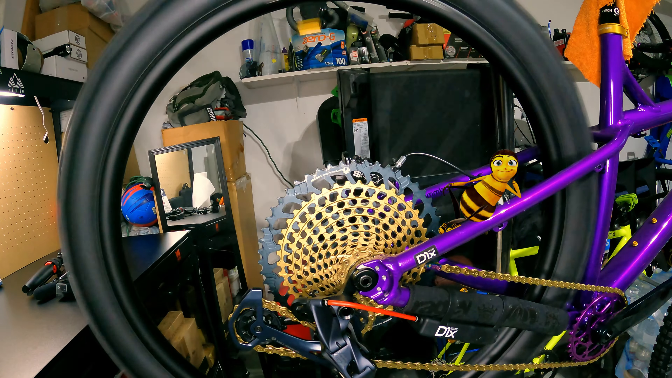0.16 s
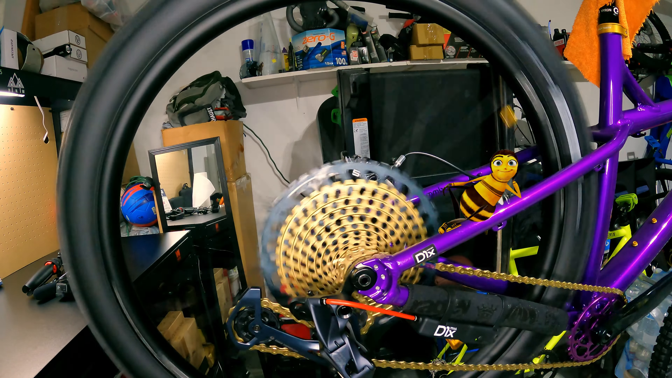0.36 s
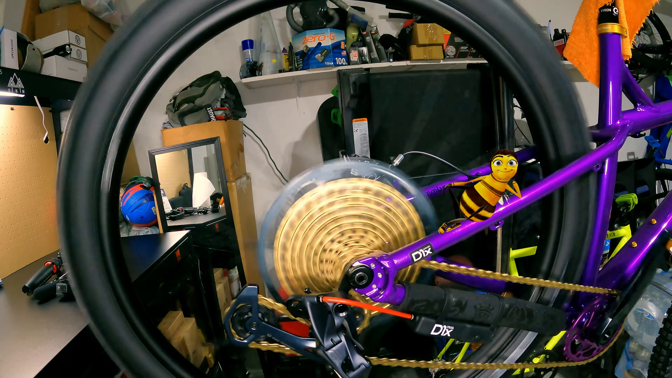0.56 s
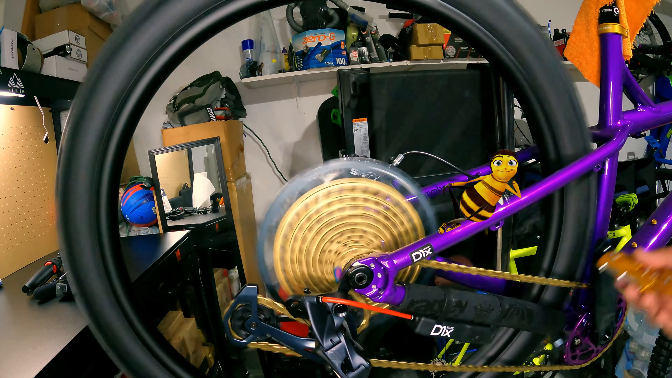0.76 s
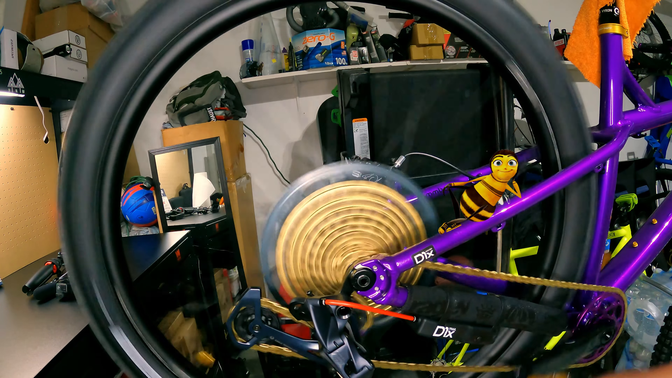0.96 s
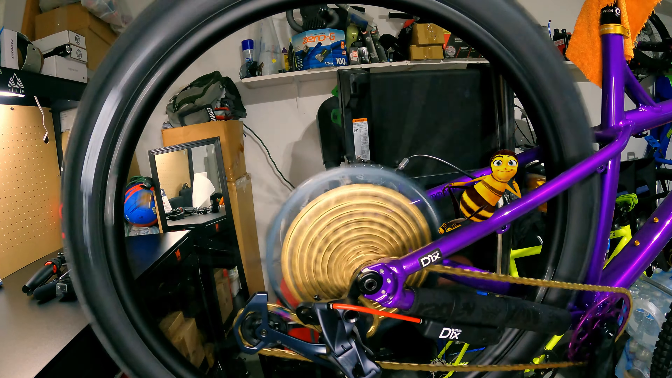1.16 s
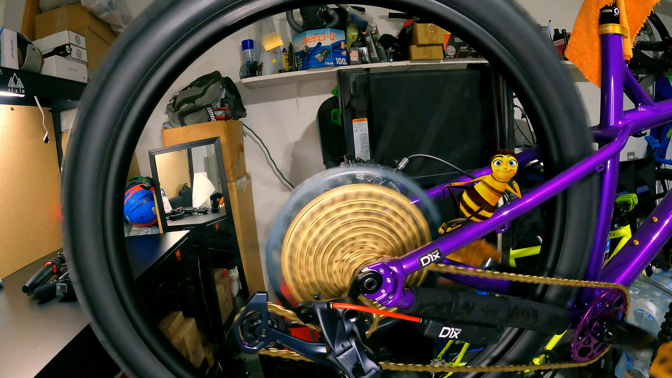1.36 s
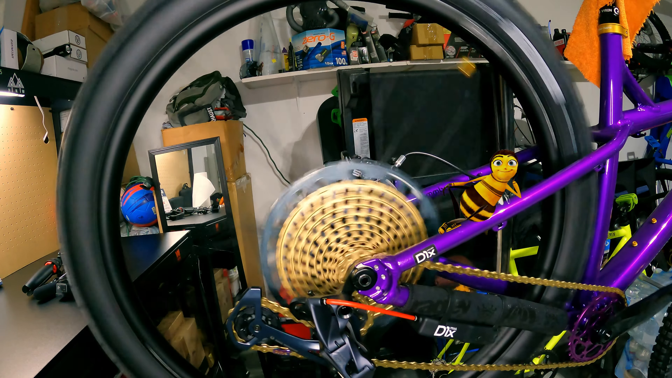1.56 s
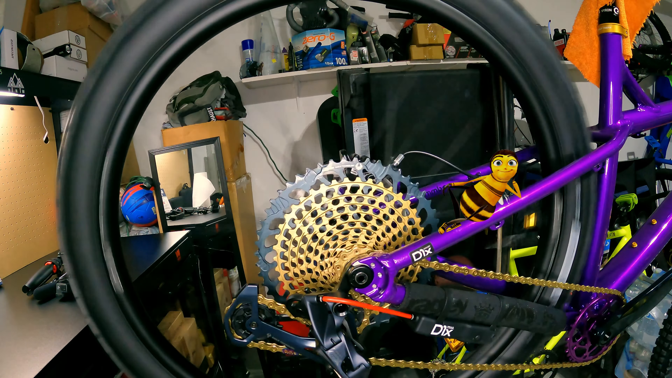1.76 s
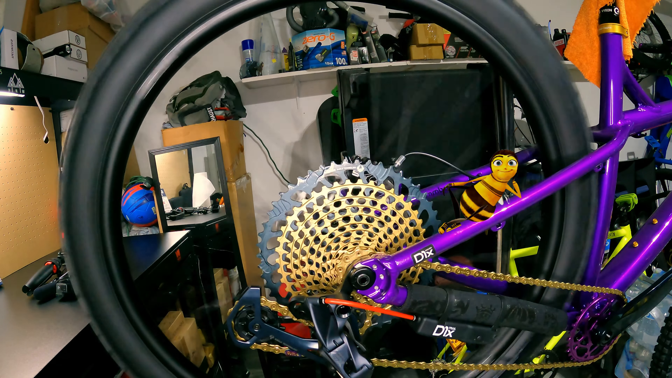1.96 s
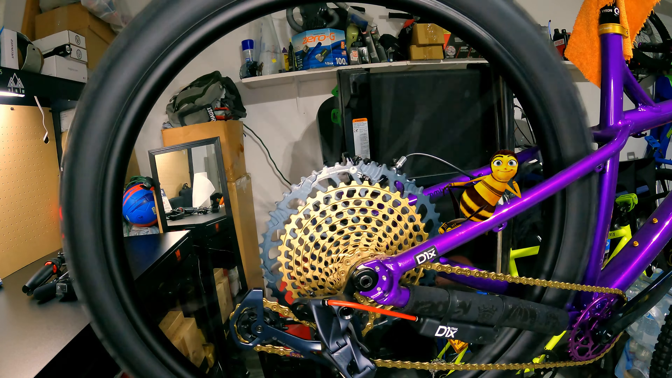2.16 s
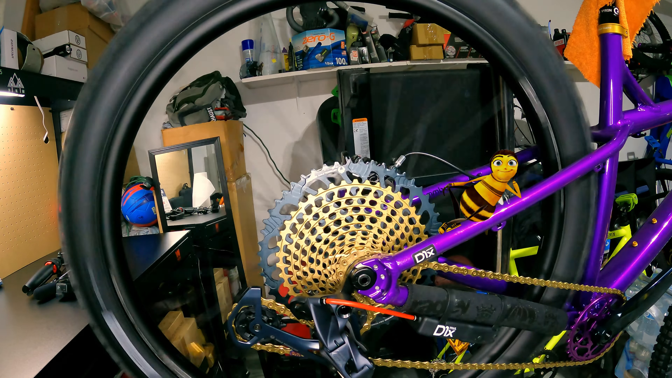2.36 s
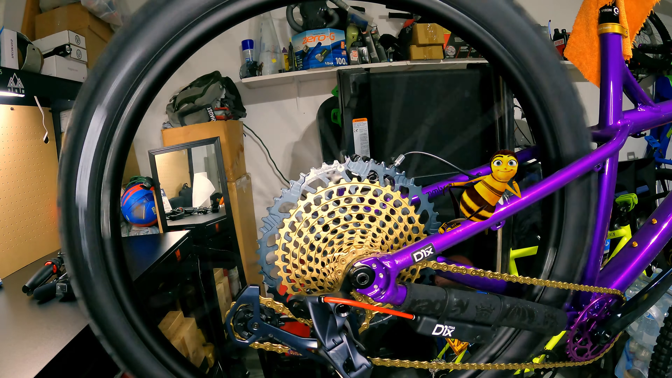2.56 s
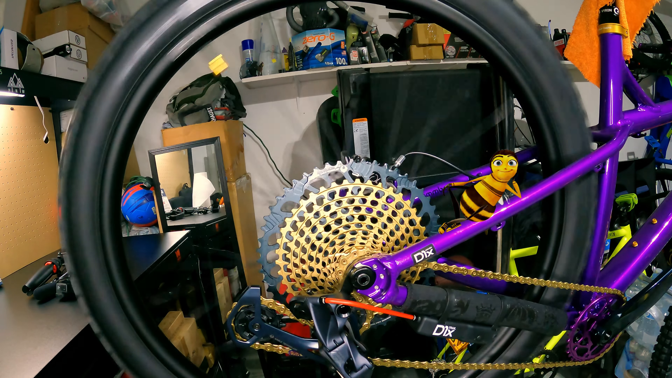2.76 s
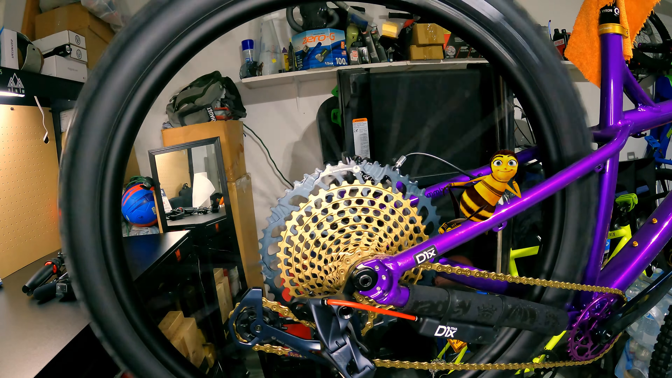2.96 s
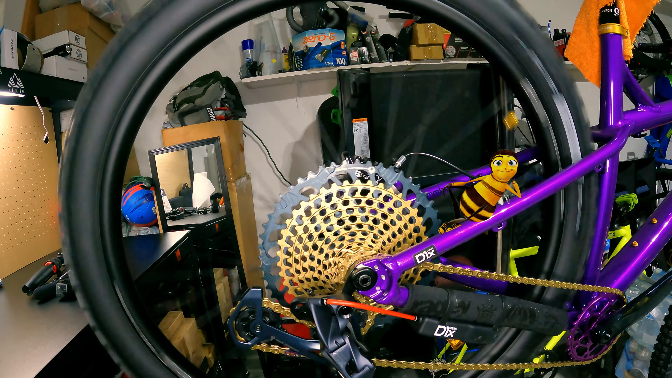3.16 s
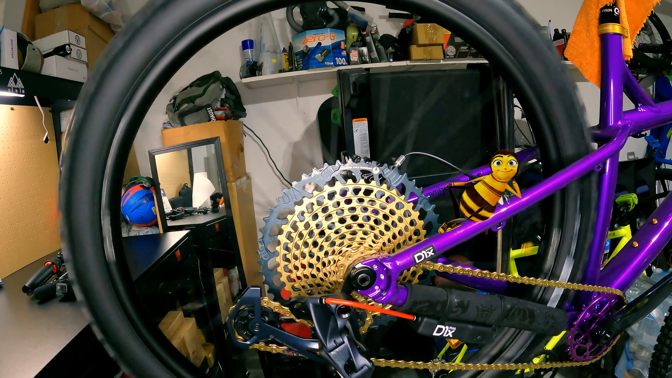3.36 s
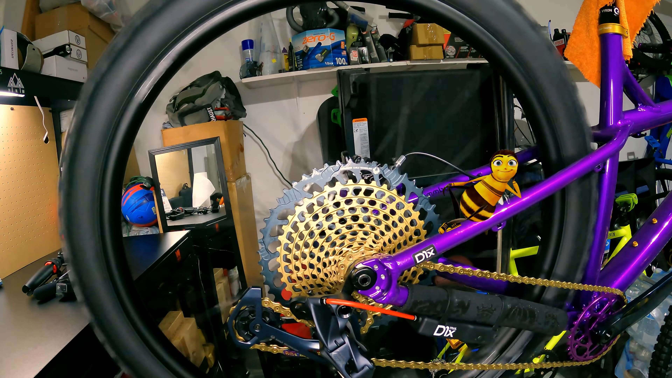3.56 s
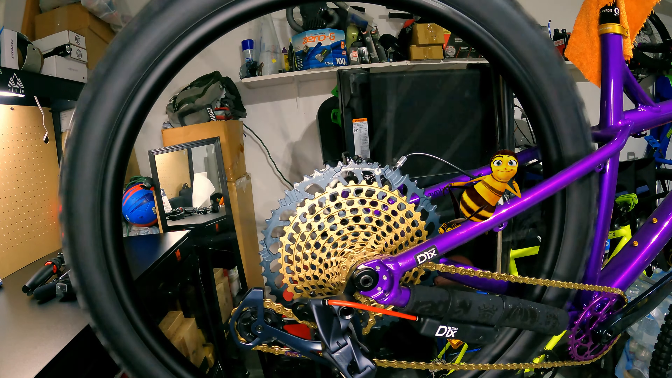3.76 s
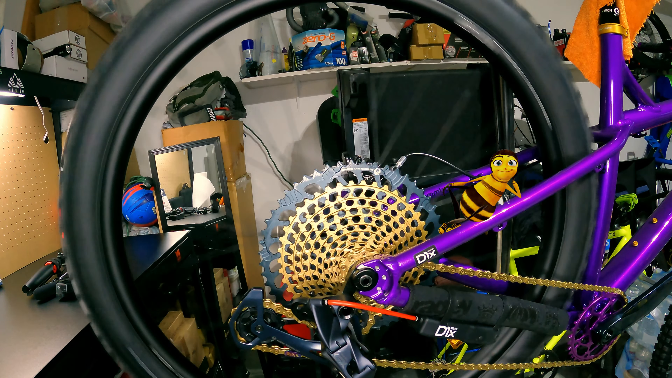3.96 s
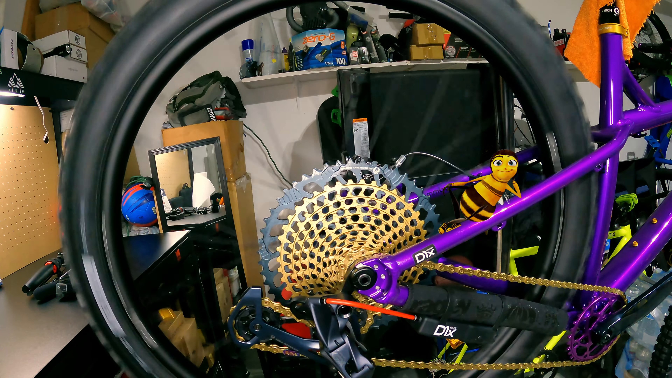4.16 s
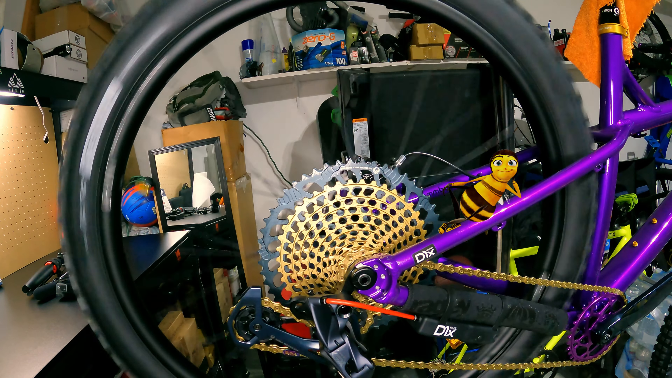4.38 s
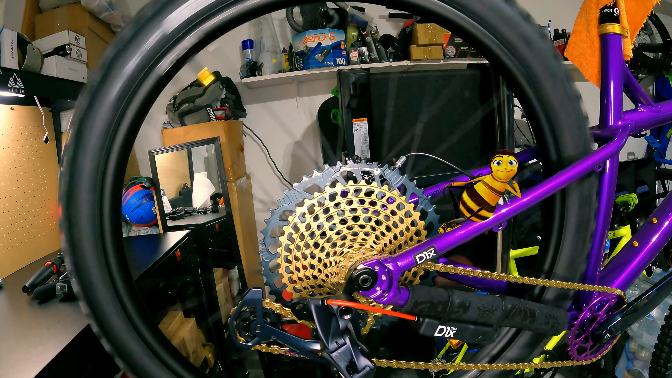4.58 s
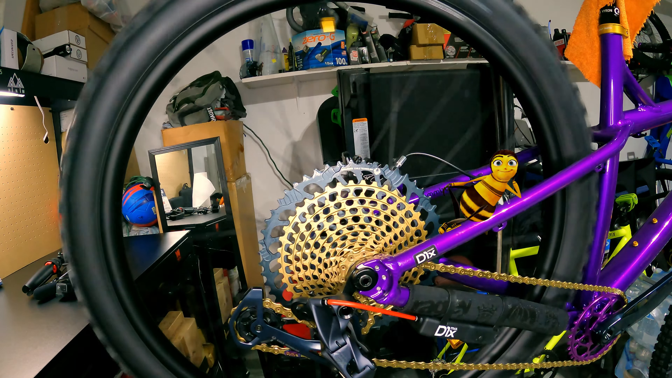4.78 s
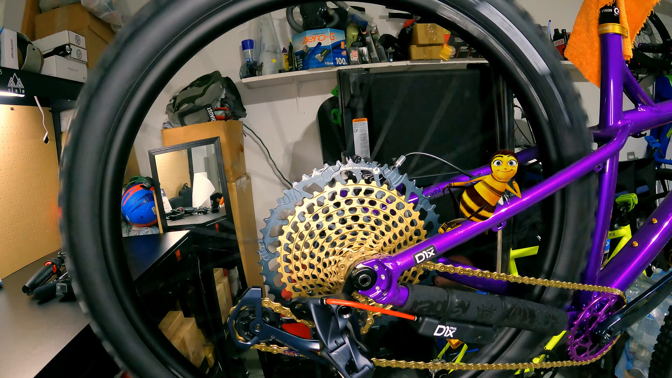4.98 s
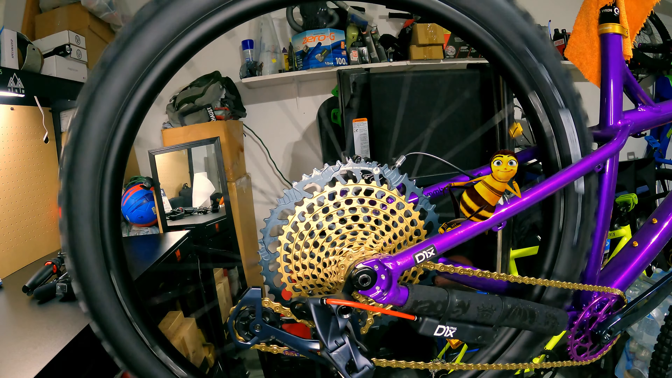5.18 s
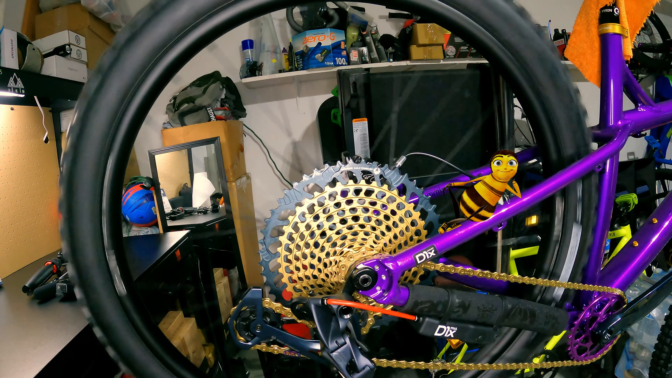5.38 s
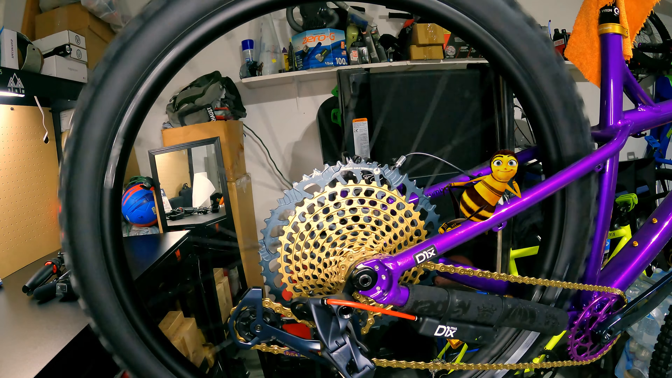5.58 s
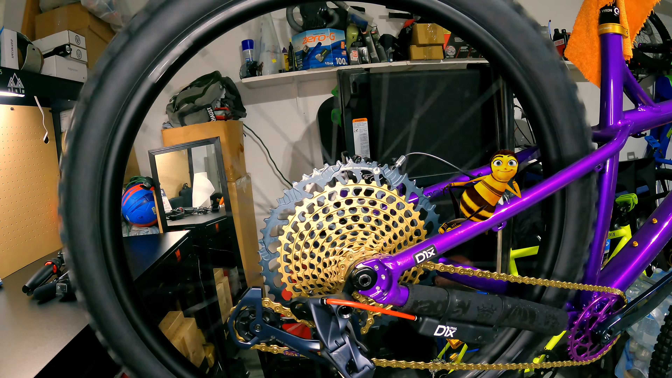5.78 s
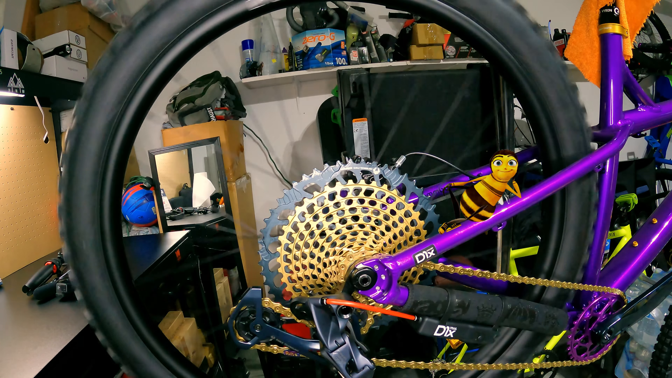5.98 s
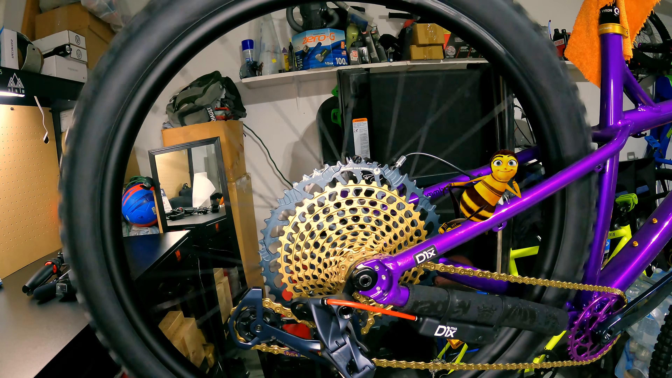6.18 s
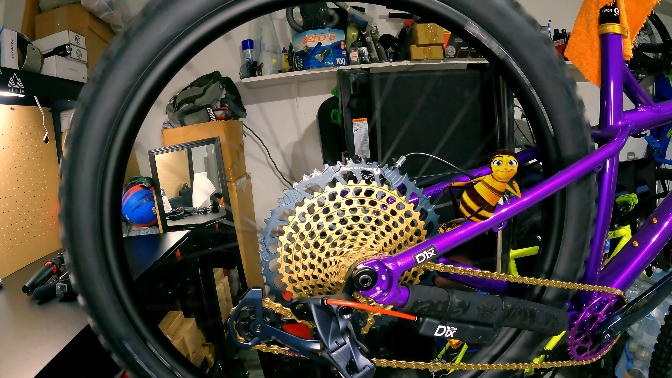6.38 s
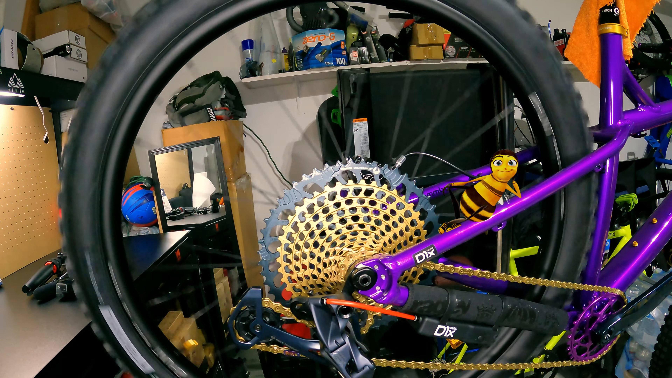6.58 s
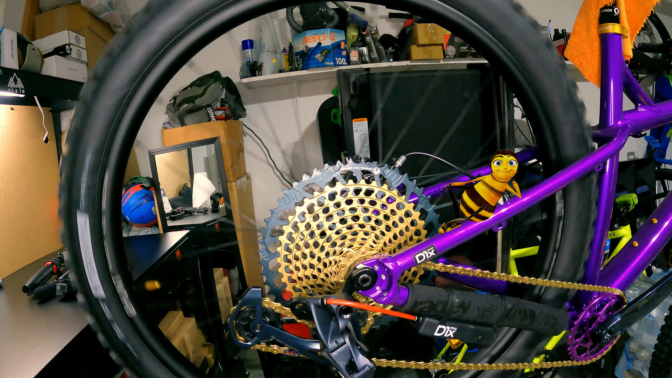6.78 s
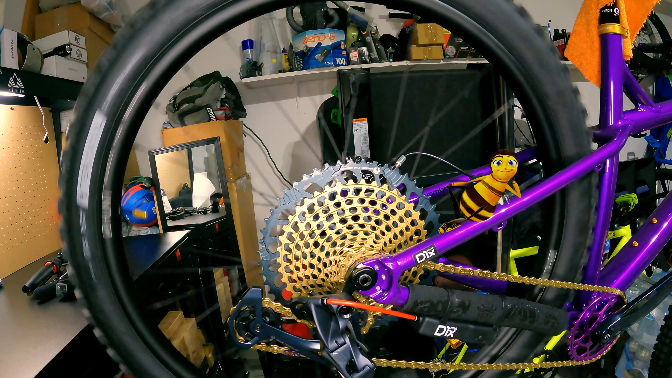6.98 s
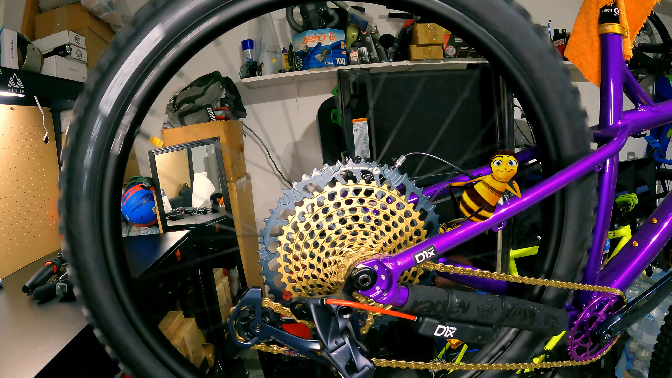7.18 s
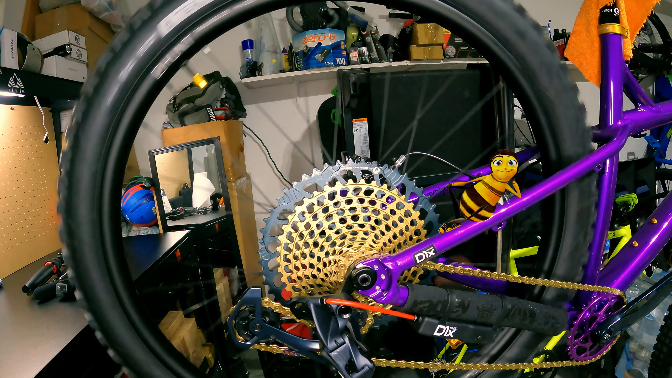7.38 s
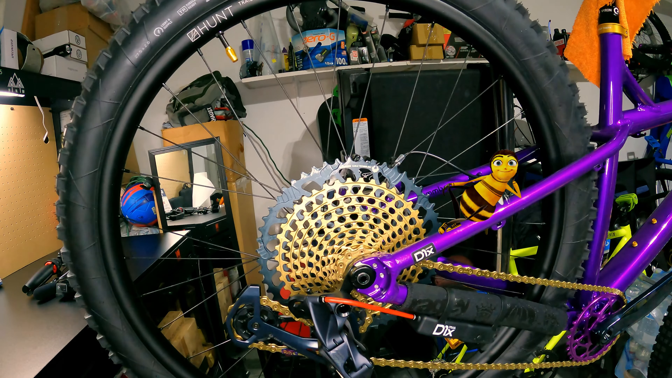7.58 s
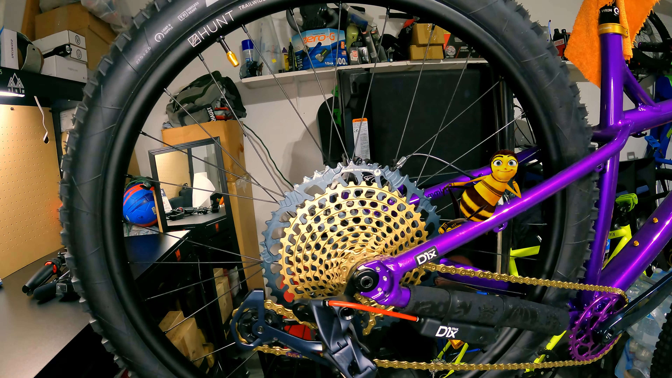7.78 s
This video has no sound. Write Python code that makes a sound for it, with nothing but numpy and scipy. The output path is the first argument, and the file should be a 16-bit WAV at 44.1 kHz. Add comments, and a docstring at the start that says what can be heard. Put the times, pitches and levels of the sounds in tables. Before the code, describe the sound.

A bicycle's rear hub buzzes from the start, a close, bright metallic ratchet as the wheel spins freely in a small workshop. At about 0.5 seconds a back-pedal whips the buzz up into a louder, ringing whine that peaks a little after 1 second and falls back by 2 seconds. The buzz then slows gradually, with a slight waver in speed around 3 seconds, growing quieter and opening into a rattle of separate clicks by 6 to 7 seconds. At about 7.6 seconds the ratchet catches with a short clunk and the clicking stops, followed by a few light metal pings. Underneath throughout are a faint low rumble, a soft rush and the steady hum of an appliance. Very faint, fluttering tones glide briefly in the background near 3 seconds and again around 6.5 seconds.

```python
"""Bicycle freehub spinning down

A rear wheel spins on a stand in a small workshop; two sets of three pawls drop in turn over the teeth.
A back-pedal whips the buzz up to a whine, then drag and friction slow it to a rattle until the pawls
catch with a clunk. Behind it sit a low rumble, a soft rush, an appliance's hum and faint gliding tones."""
import sys
import numpy as np
from scipy import signal
from scipy.fft import rfft, irfft, next_fast_len
from scipy.io import wavfile
from scipy.ndimage import uniform_filter1d

SR = 44100
rng = np.random.default_rng(int(sys.argv[2]) if len(sys.argv) > 2 else 0)


def inscribe(sig):
    """Save sig as 16-bit PCM at rate SR to the path in sys.argv[1].

    A 1-D sig is mono; a 2-D sig holds one channel per row.
    Samples are clipped to [-1, 1] before scaling.
    """
    pcm = np.round(np.clip(np.atleast_2d(sig).T, -1, 1) * 32767)
    wavfile.write(sys.argv[1], SR, pcm.astype(np.int16))


N = 345739
TIME = np.arange(N) / SR


def from_db(db):
    """Decibels to gain."""
    return 10 ** (np.asarray(db) / 20)


def rms_one(x):
    """Scale to unit rms."""
    return x / np.sqrt(np.mean(x ** 2) + 1e-20)


def automation(points):
    """A lane of (time, value) breakpoints, read at every sample."""
    return np.interp(TIME, *np.transpose(points))


def eq_gain(curve, hz):
    """Gain of an EQ curve of (Hz, dB) points, drawn on a log-frequency axis."""
    f, db = np.transpose(curve)
    return from_db(np.interp(np.log(hz + 1), np.log(f), db))


def colour(x, gain_at):
    """Filter by a gain given as a function of frequency."""
    size = next_fast_len(len(x))
    return irfft(rfft(x, size) * gain_at(np.fft.rfftfreq(size, 1 / SR)), size)[:len(x)]


def crossover(x, hz, kind):
    """The low or the high half of a 24 dB per octave crossover."""
    sos = signal.butter(2, hz, kind, fs=SR, output="sos")
    return signal.sosfilt(sos, signal.sosfilt(sos, x))


def noise(curve):
    """Unit-rms noise shaped by an EQ curve."""
    return rms_one(colour(rng.standard_normal(N), lambda hz: eq_gain(curve, hz)))


def convolve(x, response):
    """Pass a sound through an impulse response."""
    return signal.oaconvolve(x, response)[:N]


def clicks(times, heights):
    """Single impulses at the given times."""
    samples = np.round(times * SR).astype(int)
    return np.bincount(np.clip(samples, 0, N - 1), heights, N)


def body(modes, attack_eq, size=8192):
    """Unit-energy response of a struck part: resonances standing on a broadband attack."""
    hz = np.fft.rfftfreq(size, 1 / SR)
    power = eq_gain(attack_eq, hz) ** 2
    for centre, width, db in modes:
        skirts = np.minimum(hz / centre, centre / (hz + 1)) ** .5
        power += from_db(db) ** 2 / (1 + (2 * (hz - centre) / width) ** 2) * skirts
    cepstrum = irfft(np.log(power) / 2)
    response = irfft(np.exp(rfft(2 * cepstrum[:size // 2], size)))   # minimum phase: no pre-ring
    return response / np.linalg.norm(response)


def chatter(snaps, t60):
    """A brief sizzle of metal on metal, different for every snap."""
    t = TIME[:SR // 5]
    power_decay = from_db(-60 * t / t60) ** 2 * (t > 0)
    power = convolve(snaps ** 2, power_decay / power_decay.sum())
    return rng.standard_normal(N) * np.sqrt(np.abs(power))


def smear(x, round_trips, feedback):
    """A blow runs to and fro in the metal: allpass loops spread it without changing its colour."""
    for seconds in round_trips:
        loop = np.r_[1, np.zeros(int(seconds * SR)), feedback]
        x = signal.lfilter(loop[::-1], loop, x)
    return x


def tail(t60, delay):
    """Unit-energy reverb tail: dense echoes dying away after a pre-delay."""
    t = TIME[:int((t60 + delay) * SR) + 2]
    echoes = rng.standard_normal(SR)[:len(t)] * from_db(-60 * t / t60) * (t >= delay)
    return echoes / np.linalg.norm(echoes)


def shimmer(x, t60, delay, turn_hz=3.7, paths=4):
    """Echo paths fade in and out as spokes and cogs turn."""
    out = np.zeros(N)
    for k in range(paths):
        angle = 2 * np.pi * turn_hz * (1 + k // 2) * TIME + k * np.pi / 2
        out += np.cos(angle) * convolve(x, tail(t60, delay))
    return out * np.sqrt(2 / paths)


def workshop(x, low_db, treble_db, low_t60=.38, treble_t60=.27, split_hz=3200):
    """Dry sound plus room reverb; clutter soaks up the treble, which stays drier and dies first."""
    low = signal.sosfilt(signal.butter(2, split_hz, fs=SR, output="sos"), x)
    treble = signal.sosfilt(signal.butter(2, split_hz, "high", fs=SR, output="sos"), x)
    low_tail = from_db(low_db) * convolve(low, tail(low_t60, delay=.00332))
    return x + low_tail + from_db(treble_db) * shimmer(treble, treble_t60, delay=.00323)


# rumble and rush EQ: f/Hz, level/dB
RUMBLE_EQ = [(12, -55), (28, -20), (45, -9), (80, -6.5), (125, -3.5), (170, 2.5), (220, 5), (270, -2.5),
             (400, -1.5), (800, -100)]
RUSH_EQ = [(30, -40), (150, -4), (300, -8), (500, -1), (800, -2), (1400, -3.5), (2500, -1.5), (5000, -11.5),
           (9000, -29.5), (15000, -67)]
# their faders: t/s, level/dB
RUMBLE_FADER = [(0, -50), (1.8, -50), (4.7, -44), (7.84, -48)]
RUSH_FADER = [(0, -42), (.6, -39), (1.2, -38.5), (1.9, -44), (3.1, -36.5), (4.3, -39.5), (6.4, -40),
              (7.84, -41.5)]


def room_tone():
    """A bed of low rumble and soft rush, each drifting in level."""
    rumble = from_db(automation(RUMBLE_FADER)) * noise(RUMBLE_EQ)
    rush = from_db(automation(RUSH_FADER)) * noise(RUSH_EQ)
    return rumble + rush


# hum partials, relative to the fader: f/Hz, level/dB
HUM_PARTIALS = [(239.9, -3), (413, -19)]
# hum fader: t/s, level/dB
HUM_FADER = [(0, -40), (1.4, -47.5), (2.6, -42), (3.6, -43), (4.3, -40.5), (6, -40.5), (7.84, -39.5)]


def appliance_hum():
    """An appliance hums on two steady pitches, wavering in level."""
    hum = sum(from_db(db) * np.sin(2 * np.pi * (hz * TIME + rng.random())) for hz, db in HUM_PARTIALS)
    return from_db(automation(HUM_FADER)) * np.sqrt(2) * hum


# gliding tones: start t/s, end t/s, first f/Hz, last f/Hz, level/dB before flutter
GLIDES = [(2.7, 3.02, 700, 681, -47), (6.428, 6.637, 468, 550, -49), (6.446, 6.59, 817, 862, -48.5),
          (6.684, 6.82, 509, 448, -51)]


def glides(flutter_depth=.68):
    """Faint, fluttering tones rise and fall under the rattle."""
    tones = np.zeros(N)
    for start, end, first_hz, last_hz, db in GLIDES:
        along = np.interp(TIME, [start, end], [0, 1])
        phase = 2 * np.pi * np.cumsum(first_hz + (last_hz - first_hz) * along) / SR
        tones += from_db(db) * np.sqrt(np.abs(np.sin(np.pi * along))) * np.sin(phase)
    flutter = rms_one(uniform_filter1d(uniform_filter1d(rng.standard_normal(N), 900), 700))
    return tones * (1 + flutter_depth * flutter)


# ping cues: t/s, level/dB
PINGS = [(7.708, -38), (7.748, -38), (7.777, -35), (7.783, -43)]


def pings(ring_hz=3560, t60=.045):
    """Loose metal pings lightly as the wheel settles."""
    times, db = np.transpose(PINGS)
    t = TIME[:SR // 4]
    ring = np.sin(2 * np.pi * ring_hz * t) * from_db(-60 * t / t60)
    return convolve(clicks(times, from_db(db)), ring)


# the pawls' bite and the drivetrain's rebounds: t/s, relative level/dB
CATCH_HITS = [(7.6255, 0), (7.6275, -1), (7.6312, 0), (7.6352, -3), (7.645, -9), (7.658, -13)]
# frame and drivetrain resonances: f/Hz, width/Hz, level/dB
FRAME_MODES = [(167, 14, 1), (410, 26, 6), (520, 34, 1), (600, 60, -3), (850, 56, 4), (1094, 90, 1),
               (1245, 80, 2), (1815, 80, 5), (1910, 80, 4), (2200, 110, 4), (2375, 80, 6.5), (2640, 80, 1),
               (3030, 110, 4), (3290, 130, 5), (4200, 170, 2)]
# the thud beneath them: f/Hz, level/dB
THUD_EQ = [(100, -15), (350, -21.5), (1000, -29), (3000, -14), (4300, -16), (5000, -28), (6000, -36),
           (12000, -57)]
# round trips through the hub shell: t/s
SHELL_TRIPS = [.00009, .00019, .00034]


def catch_clunk(level_db=-2, rattle_db=-4):
    """The pawls bite and the chain jerks the frame."""
    times, db = np.transpose(CATCH_HITS)
    hits = clicks(times, from_db(db + level_db))
    jolt = smear(hits, SHELL_TRIPS, feedback=.62) + from_db(rattle_db) * chatter(hits, t60=.038)
    return workshop(convolve(jolt, body(FRAME_MODES, THUD_EQ)), low_db=-2.5, treble_db=-37.5)


def wheel_speed(start_speed=.9049, drag_s=18.817, friction_turns_per_s2=.057755, surge=.0104):
    """Turns per second: air drag and friction slow the wheel, its heavy spot surges once a turn."""
    brake = friction_turns_per_s2 * drag_s
    speed = (start_speed + brake) * np.exp(-TIME / drag_s) - brake
    turns = np.cumsum(speed) / SR
    return speed + surge * np.cos(2 * np.pi * (turns - .05))


TEETH, PAWL_SETS, STOP_S = 60, 2, 7.615
# the back-pedal spins the cassette against the wheel: t/s, speed/(turns/s)
BACK_PEDAL = [(.41, 0), (.6, 1.76), (.7, 2.19), (.86, 2.7), (.94, 2.9), (1, 3.36), (1.1, 3.77), (1.2, 3.82),
              (1.32, 3.73), (1.43, 3.28), (1.52, 2.75), (1.88, 0)]
# the loose cranks swing back, then forward: start t/s, fastest t/s, end t/s, peak speed/(turns/s)
CRANK_SWINGS = [(2.13, 2.35, 2.45, .165), (2.83, 3.27, 3.43, -.135)]


def drop_rate():
    """Pawl-set drops per second, from the speed of the wheel against the cassette."""
    cassette = automation(BACK_PEDAL)
    for start, fastest, end, speed in CRANK_SWINGS:
        cassette += speed * np.sin(np.pi / 2 * np.interp(TIME, [start, fastest, end], [0, 1, 0]))
    return PAWL_SETS * TEETH * (wheel_speed() + cassette)


# the six pawls: place/teeth, ring level/dB, tick level/dB
PAWLS = [(.005, 0, 0), (.02, 3, 4.5), (.036, 2, 2.5), (.488, 1.5, 1), (.535, -2, 2), (.598, 6, 4.5)]
# the slow wheel drags behind and pushes ahead of its even pace: t/s, lag/teeth
TOOTH_LAG = [(3.1, 0), (3.5, .14), (3.78, 0), (4, 0), (4.7, .022), (5.2, .012), (5.65, -.018), (6.1, .016),
             (6.65, .018), (7.3, -.024), (7.6, -.026)]


def pawl_snaps(rate, bunch_hz=350, limp_hz=32, slop_s=.00004, rasp_s=.00006):
    """Every pawl snaps down once a tooth, with its own share of low ring and bright tick."""
    teeth = np.cumsum(rate) / SR / PAWL_SETS
    teeth += (.145 - np.interp(STOP_S, TIME, teeth)) % 1   # stop just after the first set drops
    teeth -= automation(TOOTH_LAG)
    tooth = np.arange(1000)
    speed = np.interp(tooth, teeth, rate)
    spread = 1 / (1 + (speed / bunch_hz) ** 2)   # at speed a set's pawls land closer together
    rasp = rasp_s * (-1) ** tooth * (1 - spread)   # and every other tooth lands late
    rings, ticks = np.zeros((2, N))
    for place, ring_db, tick_db in PAWLS:
        jitter, slop, ring_luck, tick_luck = rng.standard_normal((len(tooth), 4)).T
        set_place = 0 if place < .4 else .5
        times = np.interp(tooth + set_place + spread * (place - set_place + .006 * jitter), teeth, TIME)
        limp_db = -5 * (set_place == 0) * (limp_hz / speed) ** 4   # the first set softens when slow
        heights = from_db(limp_db) * (times > 0) * (times < STOP_S) / np.sqrt(speed)
        times += slop_s * slop + rasp
        rings += clicks(times, heights * from_db(ring_db + .3 * ring_luck))
        ticks += clicks(times, heights * from_db(tick_db + .84 * tick_luck))
    return rings, ticks


# hub shell, cassette and spoke resonances: f/Hz, width/Hz, level/dB
HUB_MODES = [(1490, 56, -11), (1585, 55, -11.5), (1642, 50, -8), (1735, 50, -11.5), (1805, 45, -10),
             (1980, 42, -3.5), (2080, 56, -4), (2132, 44, 1.5), (2190, 44, -5.5), (2341, 50, -4.5),
             (2478, 25, -11.5), (2577, 74, -13.2), (2821, 217, -15.5), (3220, 70, -12), (3456, 60, -10.5),
             (3580, 42, -6), (3656, 44, -7), (3865, 22, -10.5), (4092, 50, -9.9), (4369, 200, -18),
             (4780, 49, -13.5), (5270, 52, -14), (5627, 48, -12.9), (6060, 170, -10.5), (7110, 100, -11.5),
             (7285, 80, -14.7), (7514, 232, -20.8), (8067, 191, -19.3), (9933, 299, -26.5),
             (11297, 182, -28.0)]
# a pawl's bare tick: f/Hz, level/dB
TICK_EQ = [(150, -58), (420, -42), (700, -27), (1000, -48), (1400, -58), (2500, -18), (4200, -17.5),
           (5200, -19.5), (6500, -20), (7500, -25.5), (8700, -33.5), (10500, -32), (12000, -37),
           (15000, -43)]
# round trips of a blow through the metal: t/s
METAL_TRIPS = [.00023, .00047, .00083, .0011]


def ratchet(rate, chatter_below_hz=430, frame_db=-27, split_hz=3000):
    """The pawls land, chatter and ring the hub; the frame adds a faint low end."""
    rings, ticks = pawl_snaps(rate)
    frame = crossover(convolve(rings, body(FRAME_MODES, THUD_EQ)), 1150, "low")
    loose = 1 / np.hypot(1, rate / chatter_below_hz)   # fast teeth leave no time to chatter
    rings = smear(rings, METAL_TRIPS, feedback=.51) + loose * chatter(rings, t60=.03)
    rings = crossover(rings, 860, "high")   # the small hub radiates little bass
    ticks = smear(ticks, SHELL_TRIPS, feedback=.64) + from_db(1) * loose * chatter(ticks, t60=.022)
    strikes = crossover(rings, split_hz, "low") + crossover(ticks, split_hz, "high")
    return convolve(strikes, body(HUB_MODES, TICK_EQ)) + from_db(frame_db) * frame


# singing bands: f/Hz, half width/Hz, resting level/dB, swell/dB, drop rate/Hz at half effect
WHINE_BANDS = [(2118, 420, -4, 6.5, 350), (3560, 200, 1.5, -0.5, 110), (4090, 140, 8, 1, 530),
               (5930, 92, 8, 4, 520)]


def hub_whine(buzz, rate, swell_width_hz=47):
    """At speed the hub's strongest rings swell as overtones of the buzz glide through them."""
    out = buzz.copy()
    for ring_hz, band_hz, rest_db, swell_db, onset_hz in WHINE_BANDS:
        detune_hz = ring_hz - rate * np.round(ring_hz / rate)
        db = rest_db + swell_db / (1 + (2 * detune_hz / swell_width_hz) ** 2)
        depth = 1 / (1 + (onset_hz / rate) ** 8)
        band = colour(buzz, lambda hz: 1 / (1 + ((hz - ring_hz) / band_hz) ** 4))
        out += band * (from_db(db * depth) - 1)
    return out


# buzz trim, fuller before the back-pedal and sagging as it ends: t/s, level/dB
BUZZ_TRIM = [(0, 2.5), (.6, -0.2), (1.35, -1.75), (1.72, -4), (1.95, -3), (2.3, -1.5), (4.5, .5),
             (7.6, 0.5)]
# treble shelf: t/s, level/dB
TREBLE_TRIM = [(0, -1), (.8, 1.1), (1.2, 1.3), (2, 0.74), (3.8, 0.44), (4.8, -1.2), (6.4, 0.4), (7.5, -1)]


def freehub(base_db=-28.5, base_rate_hz=64, db_per_octave=4, wheel_db=-9, shelf_hz=2800):
    """The ratchet with its echoes in the wheel and the room, growing louder with speed."""
    rate = drop_rate()
    hub = ratchet(rate)
    close = hub + from_db(wheel_db) * shimmer(hub, t60=.051, delay=.0022, turn_hz=9)
    buzz = workshop(close, low_db=-.5, treble_db=-4)
    power = uniform_filter1d(uniform_filter1d(buzz ** 2, 4000), 3000)
    power = np.interp(np.minimum(TIME, STOP_S - .035), TIME, power)   # held so the last tail dies freely
    buzz /= np.sqrt(power + 1e-20)   # levelled ahead of the fader
    treble = colour(buzz, lambda hz: 1 - 1 / (1 + (hz / shelf_hz) ** 4))
    buzz += (from_db(automation(TREBLE_TRIM)) - 1) * treble
    fader_db = base_db + db_per_octave * np.log2(rate / base_rate_hz) + automation(BUZZ_TRIM)
    return from_db(fader_db) * hub_whine(buzz, rate)


# stereo width, side against centre: f/Hz, level/dB
SIDE_EQ = [(30, -15), (125, -48), (500, -35.5), (1000, -43), (3000, -100), (5000, -56), (9000, -59),
           (11000, -20), (12000, 0), (15000, 3.5)]


def scene():
    """The mix sits in the centre; only the highest treble opens wide."""
    mono = freehub() + catch_clunk() + pings() + appliance_hum() + room_tone() + glides()
    diffuse = shimmer(mono, t60=.03, delay=0, paths=2)
    side = colour(diffuse, lambda hz: eq_gain(SIDE_EQ, hz))
    return np.array([mono + side, mono - side])


def record(dry, notch_hz=9040, notch_q=28, cutoff_hz=15400):
    """The microphone's narrow treble notch, then a steep high cut."""
    notched = signal.lfilter(*signal.iirnotch(notch_hz, notch_q, fs=SR), dry)
    return signal.sosfilt(signal.ellip(10, .2, 80, cutoff_hz, fs=SR, output="sos"), notched)


dry = scene()
out = record(dry)
inscribe(out)
```